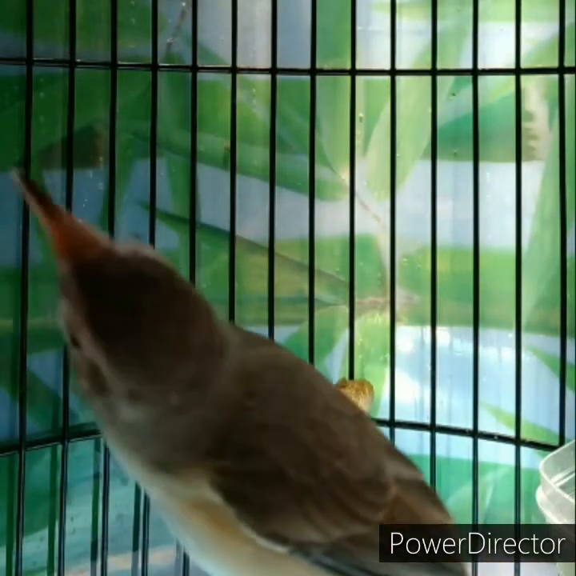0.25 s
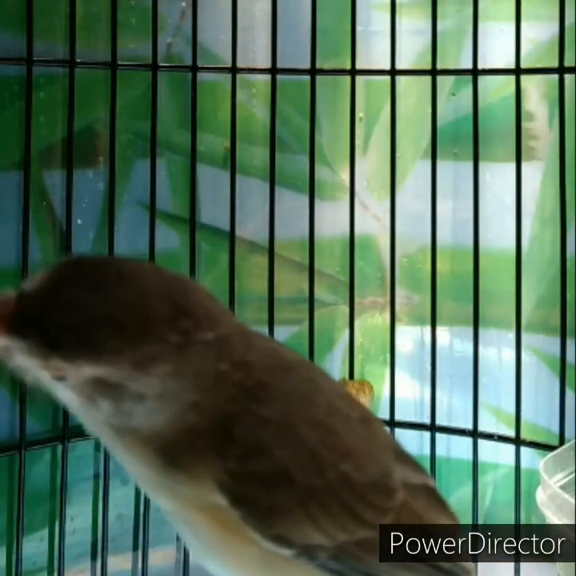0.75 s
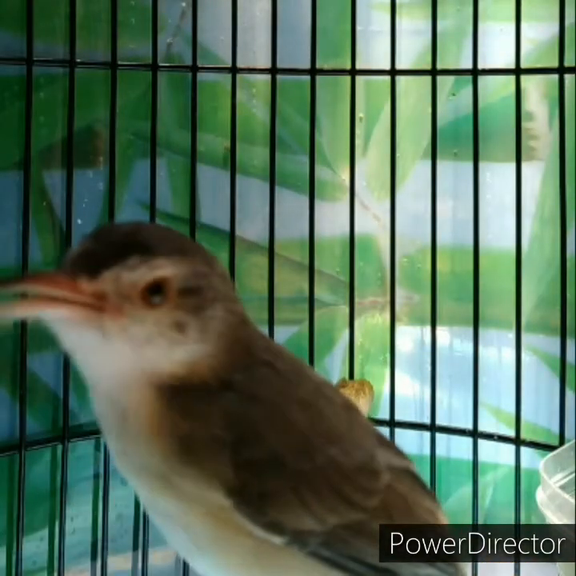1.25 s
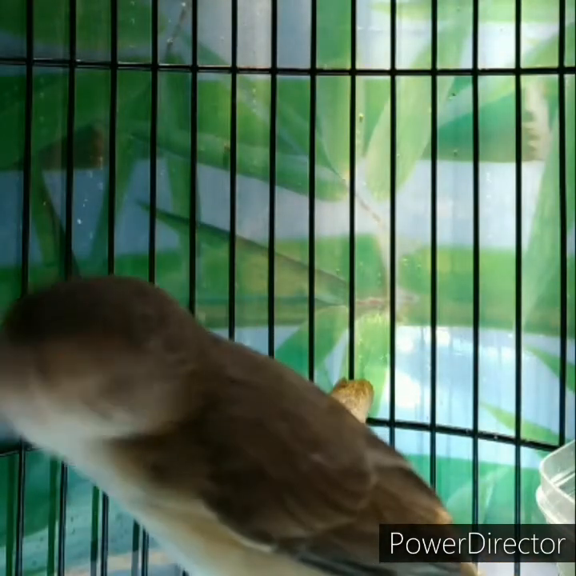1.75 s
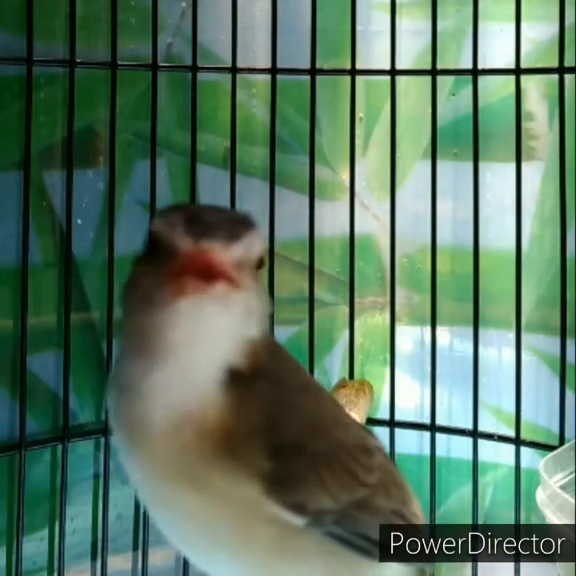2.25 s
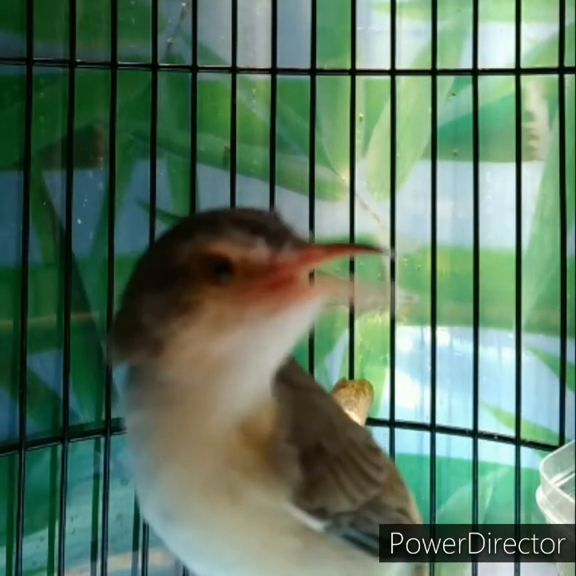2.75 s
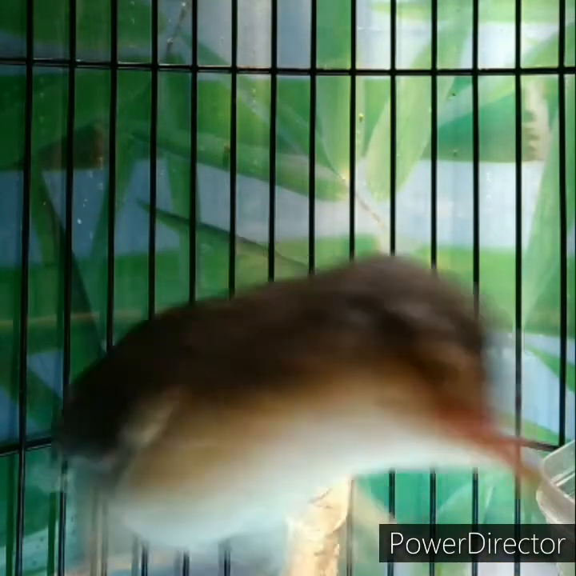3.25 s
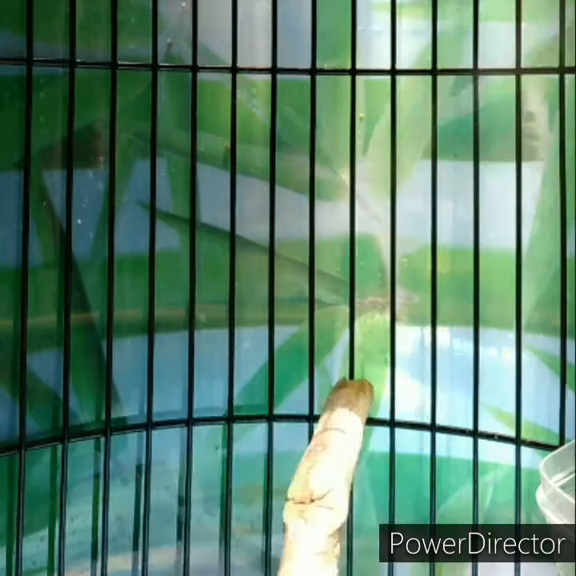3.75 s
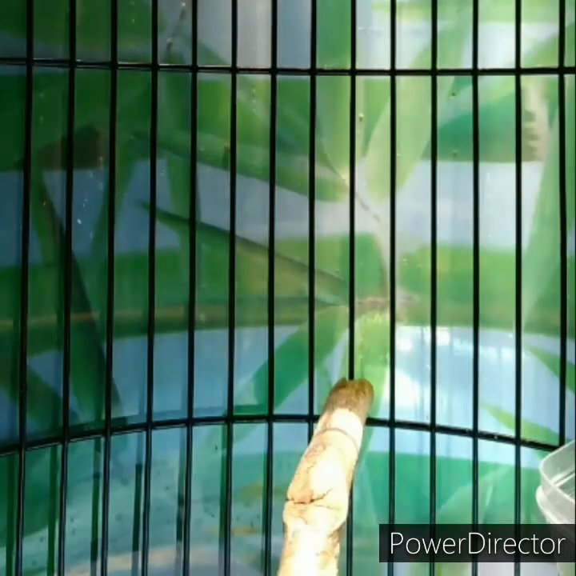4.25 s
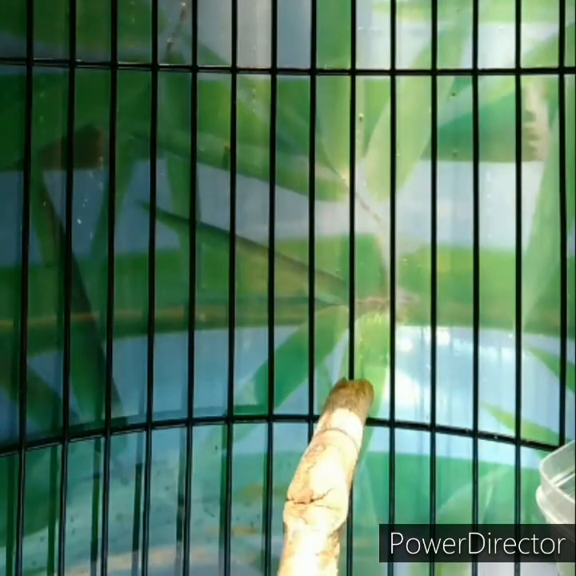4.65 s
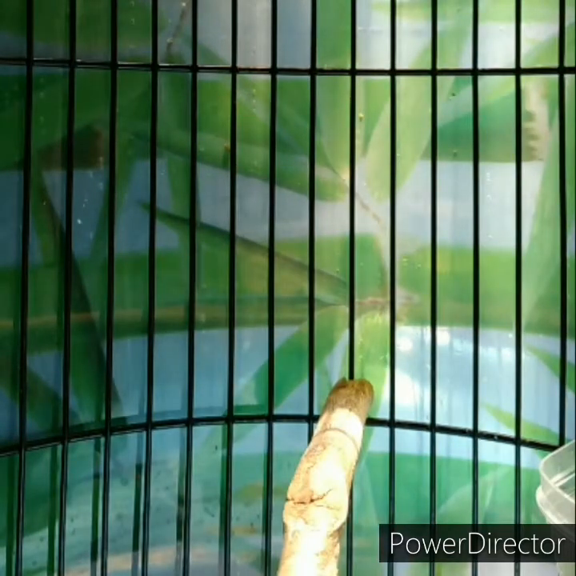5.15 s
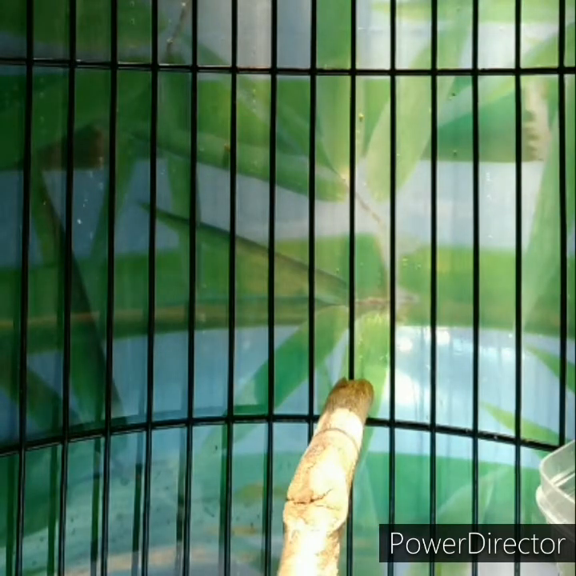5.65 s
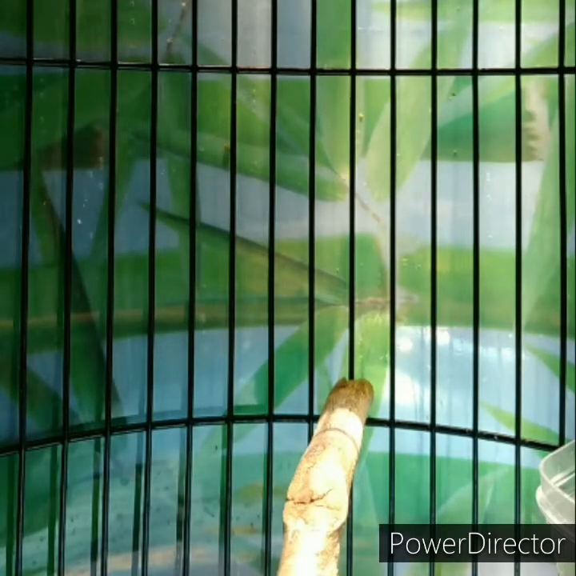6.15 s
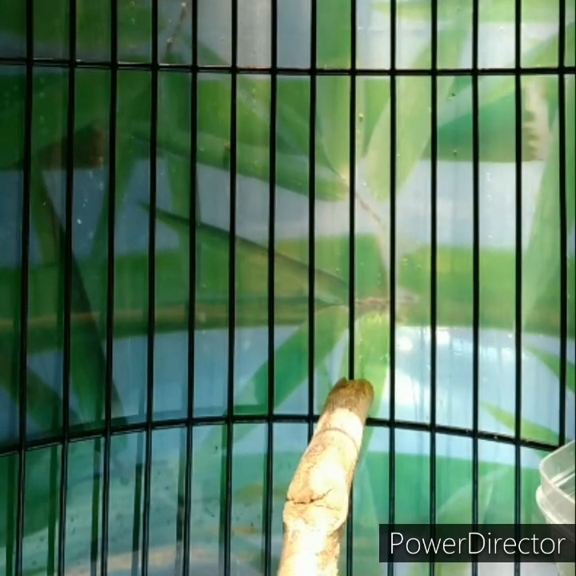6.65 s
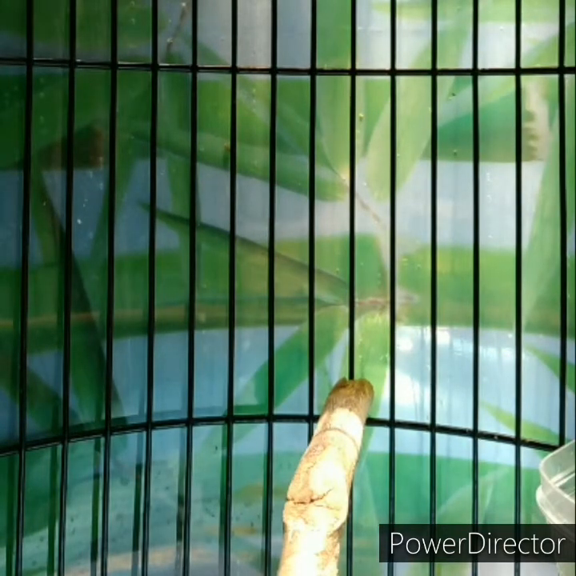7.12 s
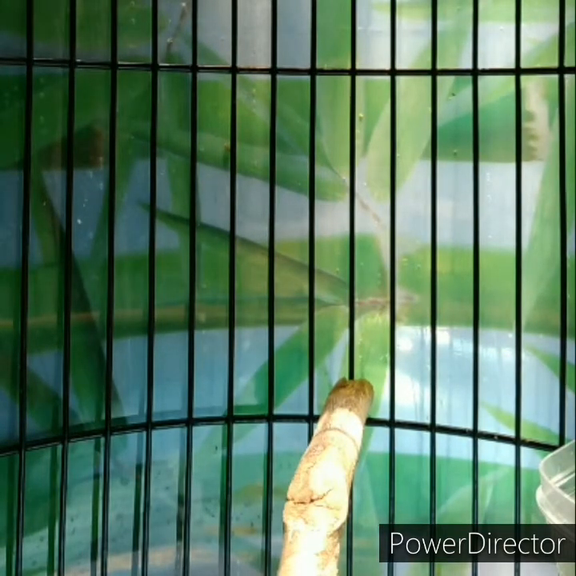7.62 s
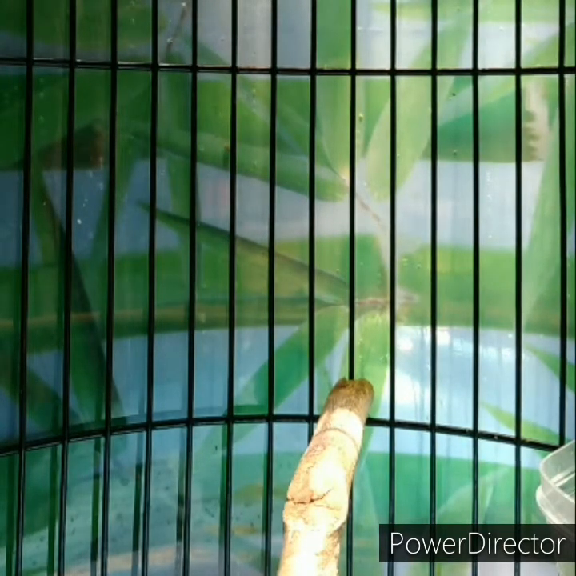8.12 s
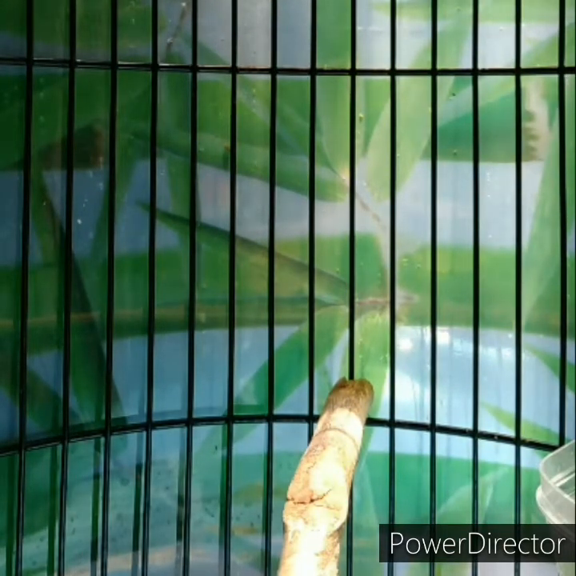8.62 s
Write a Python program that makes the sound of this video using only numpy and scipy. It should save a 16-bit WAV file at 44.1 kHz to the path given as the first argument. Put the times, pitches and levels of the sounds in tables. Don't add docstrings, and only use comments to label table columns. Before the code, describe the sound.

From 0 to about 5.8 seconds a small caged bird sings close to the microphone, a steady run of over four syllables a second. Each is two tiny raspy falling ticks, then a brief, loud chip near 4.7 kHz that swells, scoops upward and breaks off. Around 3.7 seconds it hops to a farther perch; the chips then lean right. A second bird, on the left, whistles higher falling notes irregularly, with longer slides near 2.3 and 8.2 seconds. Neighbours chatter and swoop faintly behind. From 5.8 to 7.1 the singer pauses: distant calls, light scratches at 5.6 and 6.6, a dull perch knock at 6.5 and a sinking low drone from 6.2. A shorter drone comes at 7.1 as song resumes, now leaning left, until nearly 9. Short hard-room echoes, mains hum, airy noise and low traffic, swelling around 7, lie underneath.

```python
import sys
import numpy as np
from scipy import signal
from scipy.fft import rfft, irfft
from scipy.io import wavfile
from scipy.ndimage import uniform_filter1d, minimum_filter1d

SR = 44100
rng = np.random.default_rng(int(sys.argv[2]) if len(sys.argv) > 2 else 0)


def int16_out(signal):
    q = np.round(np.clip(np.atleast_2d(signal).T, -1, 1) * 32767)
    wavfile.write(sys.argv[1], SR, q.astype(np.int16))


def undo_db(level):
    steps = np.asarray(level, float) / 20
    return 10 ** steps


N = 391608


def tone(hz, lag_s=0.):
    return np.sin(2 * np.pi * (np.cumsum(hz) / SR - lag_s * hz))


def walk(rate, size=N):
    k = max(int(SR / rate), 1)
    noise = rng.standard_normal(size + 4 * k)
    smooth = uniform_filter1d(uniform_filter1d(noise, k), k)
    return smooth[2 * k:2 * k + size] * np.sqrt(1.5 * k)


def add(out, s, x):
    i = int(s * SR)
    x = x[..., :out.shape[-1] - i]
    out[..., i:i + x.shape[-1]] += x


def band_noise(noise, low_hz, high_hz):
    return signal.sosfilt(signal.butter(2, (low_hz, high_hz), "band", fs=SR, output="sos"), noise)


def glide(length, hz0, hz1, edge):
    n = int(length * SR)
    return np.sqrt(2) * tone(np.geomspace(hz0, hz1, n)) * signal.windows.tukey(n, edge)


def sing(notes, partials, left_lag_s, wobble, flutter_db, fade_s):
    out = np.zeros((2, N))
    for note in notes:
        s, hz, left_db, right_db = note.T
        t = np.arange(s[0] - fade_s, s[-1] + fade_s, 1 / SR)
        shake = walk(240, size=len(t)) + 1.51 * walk(44.5, size=len(t))
        pitch = np.interp(t, s, hz) * (1 + wobble * shake)
        fade = np.clip(np.minimum(t - t[0], t[-1] - t) / fade_s, 0, 1)
        for port, (db, lag_s) in enumerate([(left_db, left_lag_s), (right_db, 0.)]):
            gain = np.sqrt(2) * fade * undo_db(np.interp(t, s, db))
            for multiple, *part_db in partials:
                depth_db = flutter_db * (1 if multiple == 1 else 2.5)
                flutter = undo_db(depth_db * walk(130, size=len(t)))
                partial = flutter * undo_db(part_db[port]) * tone(multiple * pitch, lag_s)
                add(out[port], t[0], gain * partial)
    return out


# multiple of the strongest tone's pitch, level at the left and at the right port in dB.
CHIP_PARTIALS = [
    (.5, -34.5, -40.5),
    (1, 6.5, 4.5),
    (1.5, -26.5, -35),
    (2, -28, -28.5),
    (2.5, -99, -32.5),
    (3, -66, -33),
]
# end in seconds, length of the loud part in seconds, strongest tone in Hz, left and right level in dB.
CHIPS_NEAR = [(0.069, 0.033, 4680, -12.5, -25), (0.277, 0.022, 4770, -9, -12.5),
              (0.498, 0.027, 4707, -11.5, -14.5), (0.716, 0.038, 4673, -13.5, -13.0),
              (0.935, 0.025, 4714, -12.5, -8.5), (1.155, 0.033, 4724, -11.5, -18.5),
              (1.37, 0.019, 4800, -6, -8), (1.603, 0.034, 4720, -9.5, -22),
              (1.839, 0.053, 4540, -12.5, -11.5), (2.055, 0.032, 4677, -15.5, -16),
              (2.27, 0.027, 4668, -11, -11.5), (2.486, 0.031, 4687, -9.5, -19.5),
              (2.725, 0.028, 4743, -11.5, -18.5), (2.952, 0.032, 4656, -13.5, -13.5),
              (3.173, 0.029, 4674, -12, -14), (3.412, 0.029, 4787, -9, -29),
              (3.629, 0.032, 4790, -10.5, -17), (3.86, 0.032, 4710, -12.0, -11)]
CHIPS_AWAY = [(4.116, 0.024, 4650, -16, -12), (4.391, 0.033, 4580, -22, -15.5),
              (4.622, 0.038, 4695, -20, -11.5), (4.836, 0.033, 4803, -23, -8.5),
              (5.067, 0.032, 4735, -21.5, -8.5), (5.299, 0.033, 4700, -25, -4.5),
              (5.533, 0.036, 4720, -17.5, -10), (5.764, 0.028, 4717, -19, -13),
              (7.195, 0.036, 4544, -13.5, -32), (7.437, 0.021, 4640, -11.0, -19),
              (7.66, 0.033, 4680, -14.5, -22), (7.892, 0.026, 4770, -18, -20.5),
              (8.11, 0.019, 4630, -12.5, -20), (8.339, 0.031, 4790, -20, -19),
              (8.574, 0.032, 4710, -20, -17), (8.812, 0.036, 4686, -18.5, -14.5)]


def chips():
    swell_s, crest_s = .026, .0099
    scoop_hz, scoop_spread, close_spread_hz = 197.6, .6, 70
    end, loud, hz, left_db, right_db = np.array(CHIPS_NEAR + CHIPS_AWAY).T[..., None]
    s = np.hstack([np.maximum(end - loud - swell_s, .005), end - loud, end - crest_s, end])
    db = np.array([-29.5, -9.5, 1.5, -8])
    scoop, close = rng.standard_normal((len(end), 2)).T[..., None]
    depth_hz = scoop_hz * (1 + scoop_spread * scoop)
    hz = hz - depth_hz * np.array([0.86, 0.294, 0, 0.063])
    hz = hz + close_spread_hz * close * np.array([0, 0, 0, 1])
    notes = np.stack([s, hz, left_db + db, right_db + db], axis=2)
    return sing(notes, CHIP_PARTIALS, left_lag_s=1.36e-4, wobble=.006, flutter_db=2.0, fade_s=.007)


# start in seconds from the pair's time, length in seconds, first and last pitch in Hz, level in dB.
TICK_SHAPE = [
    (-.0138, .0055, 6500, 2200, -1),
    (-.0065, .016, 5000, 2400, 1),
]
# time in seconds, level in dB.
TICKS_NEAR = [(0.206, -27), (0.421, -29.5), (0.633, -28), (0.857, -28.5), (1.077, -28.5), (1.301, -26.5),
              (1.526, -27.5), (1.746, -26.5), (1.974, -25), (2.196, -30), (2.411, -26.5), (2.642, -27),
              (2.865, -26.5), (3.091, -27.5), (3.333, -26.5), (3.551, -26.5)]
TICKS_AWAY = [(3.783, -31.5), (4.035, -29), (4.299, -31), (4.532, -30.5), (4.768, -30), (4.987, -25.5),
              (5.216, -28.5), (5.452, -27.5), (5.696, -35), (7.11, -33.5), (7.363, -32.5), (7.588, -32),
              (7.816, -29.5), (8.03, -32), (8.267, -30.5), (8.496, -32), (8.731, -29.5)]


def ticks():
    rasp, spit_db, overtone_db, left_db = .5, -15, -20, -2
    out = np.zeros((2, N))
    for s, tick_db in TICKS_NEAR + TICKS_AWAY:
        left_lag_s = 1.4e-4 if s < 3.75 else 3e-4
        for start, length, hz0, hz1, db in TICK_SHAPE:
            fall = glide(length, hz0, hz1, 0.44)
            fall = fall + undo_db(overtone_db) * glide(length, 2.6 * hz0, 2.7 * hz1, 1.0)
            n = len(fall)
            for port, (lag_s, pan_db) in enumerate([(left_lag_s, left_db), (0, 0)]):
                rough = 1 + rasp * walk(1400, size=n)
                spit = undo_db(spit_db) * rng.standard_normal(n) * np.hanning(n)
                add(out[port], s + start + lag_s, (fall * rough + spit) * undo_db(db + tick_db + pan_db))
    return out


# multiple of its pitch, left and right level in dB.
WHISTLE_PARTIALS = [
    (1, 0, 0),
    (2, -33, -24),
]
# start in seconds, length of the slow fall in seconds, first pitch in Hz,
# pitch after the slow fall in Hz, level in dB.
WHISTLES = [(0.156, 0.037, 7260, 6860, -18.5), (0.487, 0.035, 7150, 6550, -21.5),
            (0.629, 0.06, 7410, 6850, -17), (1.27, 0.02, 6840, 6420, -20.5),
            (1.528, 0.03, 7030, 6810, -15.5), (1.794, 0.034, 7050, 6660, -17.5),
            (2.238, 0.21, 7270, 6106, -16.5), (4.576, 0.017, 6940, 6250, -17.5),
            (4.765, 0.045, 7330, 6600, -14), (5.144, 0.027, 6550, 5920, -21),
            (5.32, 0.055, 7350, 6720, -14), (6.801, 0.016, 6740, 6410, -19.5),
            (7.196, 0.014, 7000, 6440, -15), (7.384, 0.041, 7250, 6740, -13.5),
            (7.737, .017, 6740, 5880, -25), (7.866, 0.055, 7110, 6640, -18.5),
            (8.169, .225, 7100, 5955, -19.5)]


def whistles():
    rise_share, dive_s, dive_hz, right_db = .2, 0.017, 850, -12.5
    start, fall, first, last, level = np.array(WHISTLES).T[..., None]
    share = np.array([0, rise_share, 1, 1])
    dive = np.array([0, 0, 0, 1])
    s = start + share * fall + dive * dive_s
    hz = first + share ** 1.12 * (last - first) - dive * dive_hz
    db = level + np.array([-8, 0, 0, -15])
    notes = np.stack([s, hz, db, db + right_db], axis=2)
    return sing(notes, WHISTLE_PARTIALS, left_lag_s=3.6e-5, wobble=0.0031, flutter_db=3., fade_s=0.004)


# seconds from its start, pitch in Hz, level in dB.
SWOOP = [
    (0, 3650, -3.5),
    (0.031, 4050, -13.5),
    (.045, 3600, 3.5),
    (.068, 2680, 2.5),
    (.095, 2800, -2),
    (.125, 3400, -1.5),
]
# start in seconds, stretch in time (1 = as written), level in dB.
SWOOPS = [
    (1.776, 0.89, -33.5),
    (2.575, 1.02, -33.5),
    (3.995, 1.12, -34.5),
    (4.641, .95, -32),
    (5.298, 0.99, -31.5),
]


def swoops():
    s, hz, db = np.transpose(SWOOP)
    notes = []
    for start, stretch, level in SWOOPS:
        notes.append(np.transpose([start + stretch * s, hz, level + db, level + db]))
    return sing(notes, [(1, 0, 0)], left_lag_s=0., wobble=.008, flutter_db=2., fade_s=.005)[0]


def calls(table, edge, octave_db):
    out = np.zeros(N)
    for s, length, hz0, hz1, db in table:
        octave = undo_db(octave_db) * glide(length, 2 * hz0, 2 * hz1, edge)
        add(out, s, undo_db(db) * (glide(length, hz0, hz1, edge) + octave))
    return out


# start in seconds, length in seconds, first and last pitch in
# Hz, level in dB.
CHATTER = [(0.0, 0.0039, 3900, 2256, -27), (2.352, 0.0092, 4460, 2380, -38), (2.44, 0.059, 3350, 3240, -42),
           (3.22, 0.027, 4660, 3980, -48), (3.86, 0.026, 3025, 3420, -33.5), (4.41, 0.01, 3950, 2220, -33),
           (4.425, .045, 2300, 2940, -40.5), (4.485, 0.021, 2690, 3470, -37),
           (4.51, 0.043, 3516, 3370, -36.5), (5.07, 0.071, 2720, 2437, -39.5),
           (5.15, 0.026, 3060, 3490, -30.5), (6.095, 0.013, 4380, 4140, -46),
           (6.34, 0.014, 5900, 4160, -40.5), (6.39, 0.035, 6060, 3940, -42), (6.43, 0.04, 3780, 2750, -41),
           (6.555, 0.021, 5900, 4160, -42), (6.64, 0.014, 7800, 5000, -44),
           (6.815, 0.015, 6400, 4460, -26.5), (6.878, 0.012, 4680, 4120, -36.5),
           (6.922, 0.008, 7240, 2140, -34.5), (7.0, .01, 7560, 6000, -40), (7.53, 0.023, 4580, 4100, -46),
           (7.93, 0.029, 4660, 3980, -38.5)]
FAR = [(.3, .12, 1750, 2300, -50), (1.12, 0.18, 1950, 2600, -52), (4.15, 0.11, 1596, 1618, -49),
       (4.32, .13, 1420, 1230, -51), (5.82, 0.13, 3820, 3720, -49), (5.8, .1, 1450, 1480, -54),
       (5.85, .15, 1900, 1800, -54), (6.33, 0.27, 2080, 2000, -53), (6.65, 0.11, 1985, 1900, -50),
       (6.53, 0.1, 2780, 2760, -49), (6.68, .1, 3900, 3800, -53), (3.2, .3, 2350, 2450, -56),
       (8.0, 0.28, 2360, 2256, -51.5), (8.4, 0.081, 1534, 1680, -52), (8.59, 0.088, 1325, 1257, -52)]


def stray_calls():
    return calls(CHATTER + FAR, edge=0.1, octave_db=-16.5) + swoops()


# start in seconds, length in seconds, centre in Hz, level in dB.
RUSTLES = [
    (5.614, 0.12, 5060, -43),
    (6.509, 0.064, 1080, -39),
    (6.599, 0.07, 4600, -39.5),
]


def rustles():
    out = np.zeros((2, N))
    for s, length, hz, db in RUSTLES:
        n = int(length * SR)
        grit = rng.standard_normal((2, n)) * undo_db(3.7 * walk(143, size=n)) * signal.windows.tukey(n, .4)
        add(out, s, undo_db(db) * band_noise(grit, hz / 2, 1.4 * hz))
    return out


# delay at the left port and at the right port in seconds, level in dB.
ECHOES = [
    (.0046, 0.004, -9.5),
    (0.0118, .0092, -17.5),
    (0.0165, .0205, -17),
]


def echoes(x):
    out = x.copy()
    for left_s, right_s, db in ECHOES:
        for port, s in enumerate([left_s, right_s]):
            add(out[port], s, undo_db(db) * x[1 - port])
    return out


def room(x, t60, wet_db, gap_s):
    t = np.arange(SR // 4) / SR
    tail = rng.standard_normal((2, len(t))) * undo_db(-60 * t / t60) * (t > gap_s)
    tail /= np.sqrt((tail ** 2).sum(axis=1, keepdims=True))
    return undo_db(wet_db) * signal.fftconvolve(np.atleast_2d(x), tail, axes=1)[:, :N]


# resonance in Hz, width in Hz, boost in dB.
PORTS = [
    (7370, 1450, 12),
    (11130, 1630, 13),
]


def ports(x):
    out = []
    for sound, (hz, width, db) in zip(x, PORTS):
        ringing = signal.lfilter(*signal.iirpeak(hz, hz / width, fs=SR), sound)
        out.append(sound + undo_db(db) * ringing)
    return np.array(out)


# start in seconds, length in seconds, first and last pitch in Hz, level in dB.
DRONES = [
    (6.2, 0.75, 288, 273, -54),
    (7.08, 0.168, 259.5, 233, -50.5),
]


def drones():
    return calls(DRONES, edge=0.4, octave_db=-19)


# time in seconds, level in dB.
TRAFFIC = [
    (6.601, -66),
    (7.3, -49.5),
]


def hum():
    mains_hz, mains_db = 99.4, -51
    mains_gain = np.sqrt(2) * undo_db(mains_db + 2.1 * walk(14.2))
    mains = mains_gain * tone(mains_hz * (1 + 0.0031 * walk(3.2)))
    road = band_noise(rng.standard_normal(N), 125, 200)
    road_db = np.interp(np.arange(N) / SR, *np.transpose(TRAFFIC)) - 4.0
    return mains + road / road.std() * undo_db(road_db)


# frequency in Hz, level in dB per Hz.
AIR = [(28, -9.5), (48, 7), (66, -0.5), (82, -6.5), (130, -5), (220, -12), (360, -4), (450, -18),
       (520, -10.5), (600, -16.5), (1100, -21.5), (2200, -16), (5000, -21), (15500, -30.5)]


def air():
    level_db = -46.5
    hz = np.fft.rfftfreq(N, 1 / SR)[1:]
    table_hz, table_db = np.transpose(AIR)
    colour = undo_db(np.interp(np.log(hz), np.log(table_hz), table_db))
    alike = .97 / (1 + (hz / 520) ** 4.3)
    noise = rfft(rng.standard_normal((2, N)))[:, 1:]
    mid, side = noise * colour * np.sqrt([1 + alike, 1 - alike])
    both = np.array([mid + side, mid - side])
    octave = np.log2(hz / 28)
    out = 0
    for band in range(10):
        share = np.clip(1 - abs(octave - band), 0, 1)
        flicker = undo_db(1.3 * walk(5) + 2.2 * walk(18))
        out = out + flicker * irfft(np.pad(share * both, ((0, 0), (1, 0))), N)
    return out * undo_db(level_db) / out.std()


def scene():
    singer, pairs, second, others = chips(), ticks(), whistles(), stray_calls()
    head_turns = walk(260) + .25 * walk(1500)
    chip_room = room(singer.sum(axis=0) * head_turns, t60=.18, wet_db=-16.5, gap_s=.006)
    tick_room = room(pairs[1], t60=.19, wet_db=-9, gap_s=.003)
    second_room = room(second[0], t60=0.16, wet_db=-9, gap_s=.003)
    others_direct = undo_db(-11.5) * others * np.array([[1], [-1]])
    others_room = room(others * (1 + 0.39 * walk(107)), t60=0.18, wet_db=0, gap_s=0.00076)
    broad = ports(echoes(pairs) + tick_room + rustles() + air())
    birds = singer + chip_room + echoes(second) + second_room + others_direct + others_room
    return birds + broad + drones() + hum()


def band_limit(x):
    return signal.sosfilt(signal.butter(12, 15630, fs=SR, output="sos"), x)


def record(dry):
    ceiling, top_hz = .985, 15600
    peak = -minimum_filter1d(-abs(dry), size=301, axis=1)
    gain = np.minimum(1, ceiling / (peak + 1e-9))
    loud = dry * uniform_filter1d(gain, size=150, axis=1)

    cells = signal.stft(loud, nperseg=512)[2]
    power = uniform_filter1d(uniform_filter1d(abs(cells) ** 2, size=5, axis=1), size=3, axis=2)
    nearby = -minimum_filter1d(-power, size=29, axis=1, origin=6)
    nearby = -minimum_filter1d(-nearby, size=13, axis=2, origin=4)

    chance = rng.standard_normal((2, 33, power.shape[2] // 4 + 1))
    patches = np.kron(chance, np.ones((8, 4)))[:, :257, :power.shape[2]]
    threshold = (nearby * undo_db(2 * -41) + undo_db(2 * -81)) * undo_db(11 * patches)
    thinned = cells * np.where(power < threshold, undo_db(-22), 1)
    kept = signal.istft(thinned, nperseg=512)[1][:, :N]
    kept = signal.sosfilt(signal.ellip(10, .2, 70, top_hz, fs=SR, output="sos"), kept)
    return band_limit(kept)


dry = scene()
out = record(dry)
int16_out(out)
```